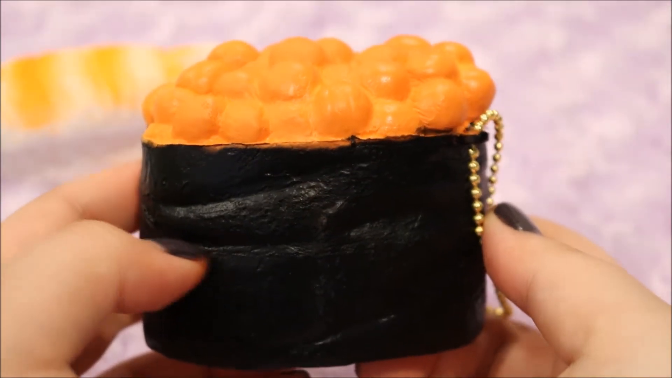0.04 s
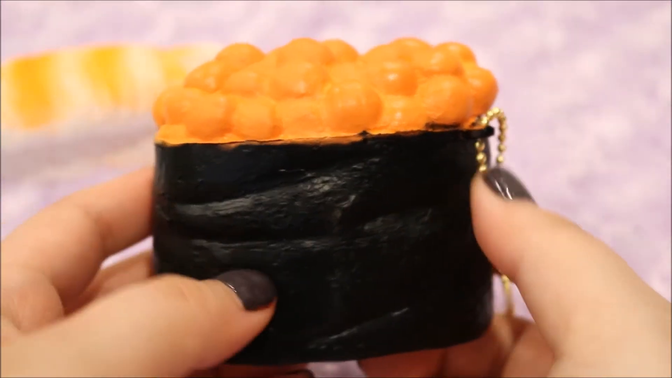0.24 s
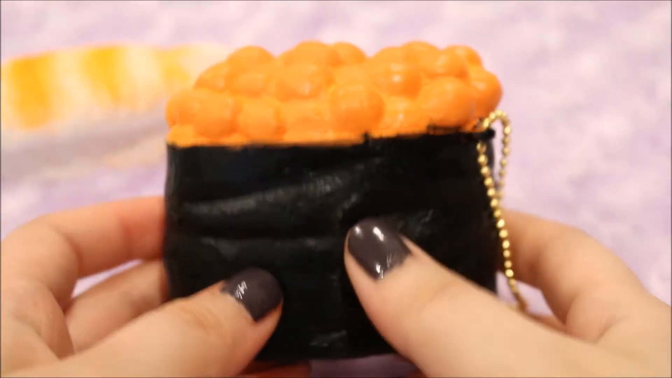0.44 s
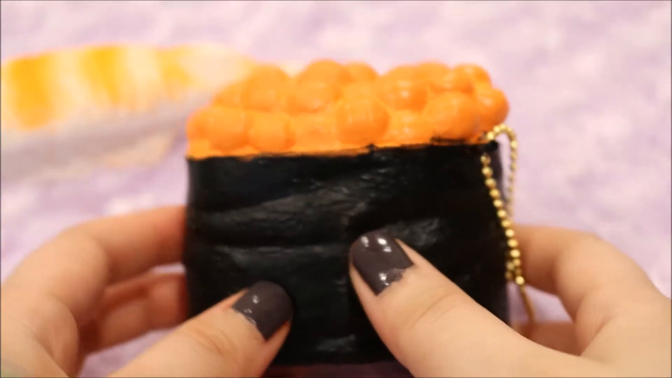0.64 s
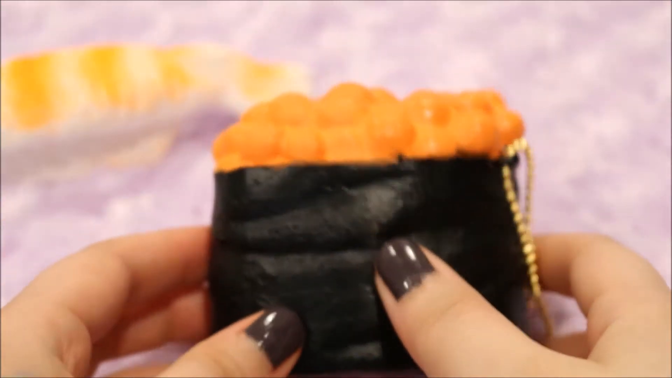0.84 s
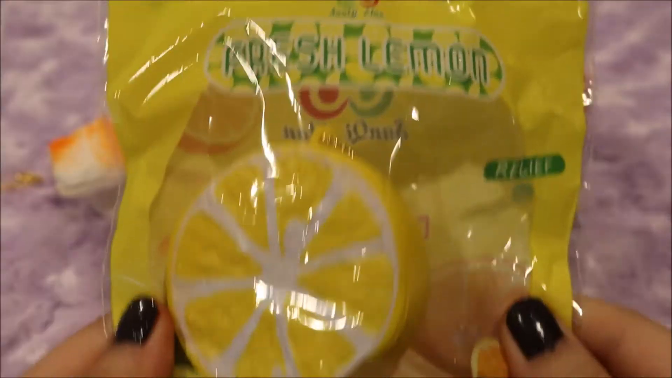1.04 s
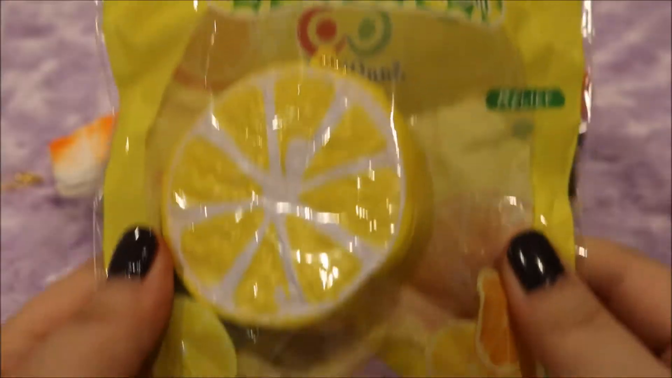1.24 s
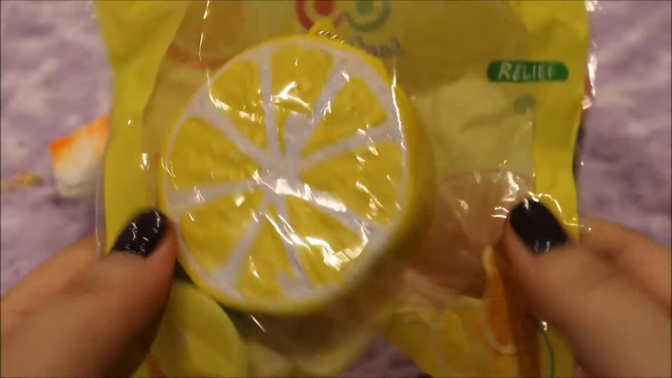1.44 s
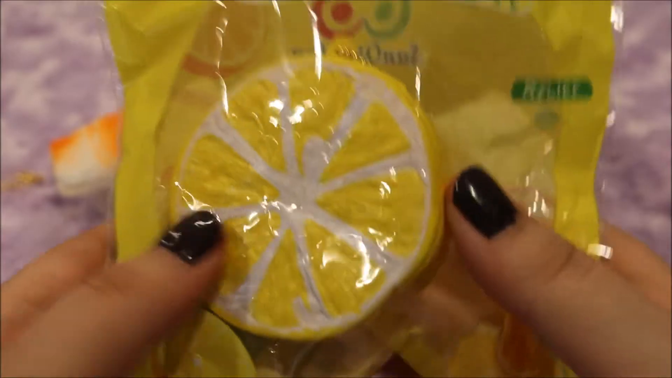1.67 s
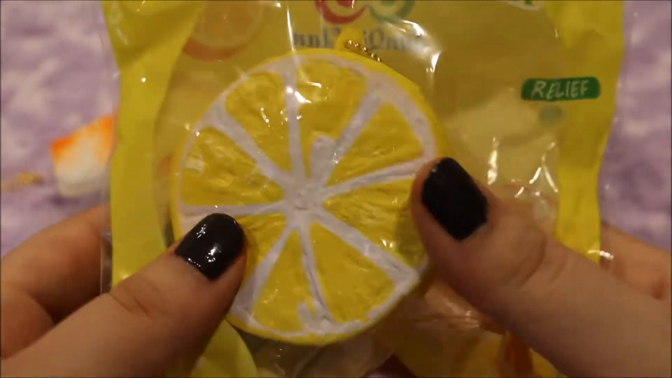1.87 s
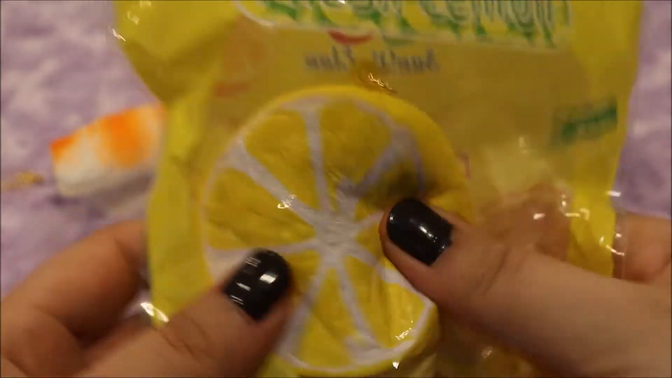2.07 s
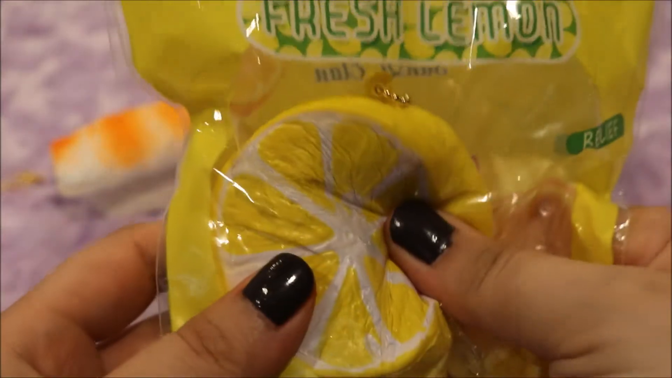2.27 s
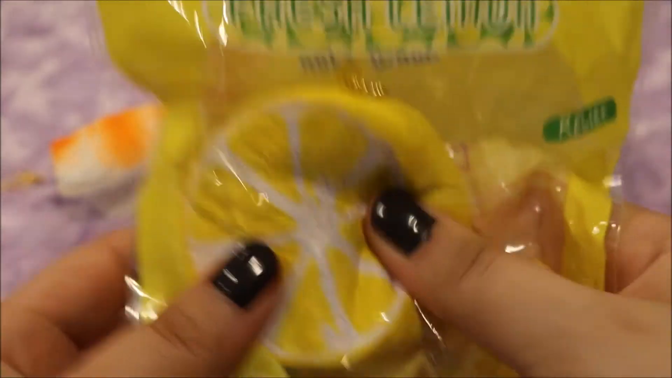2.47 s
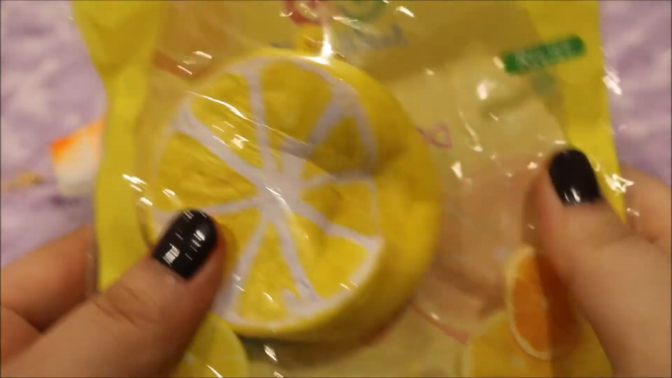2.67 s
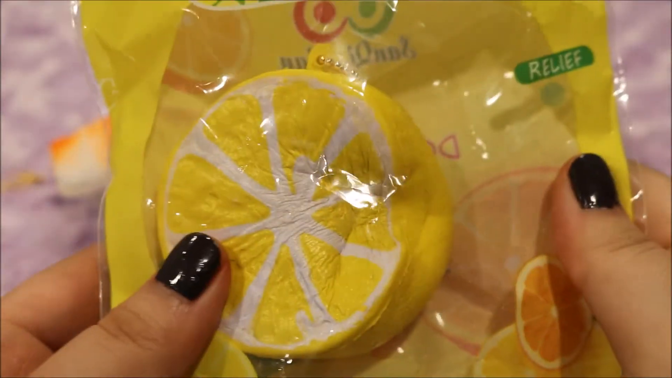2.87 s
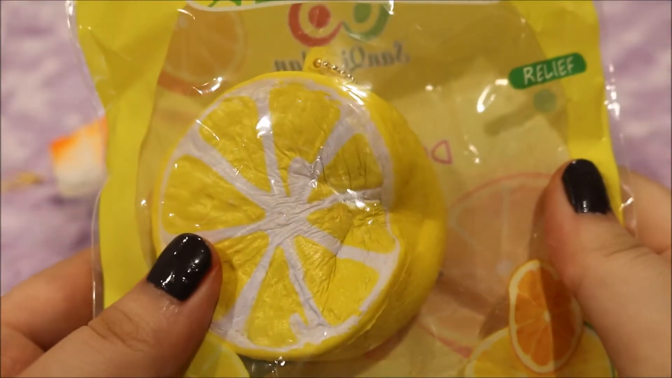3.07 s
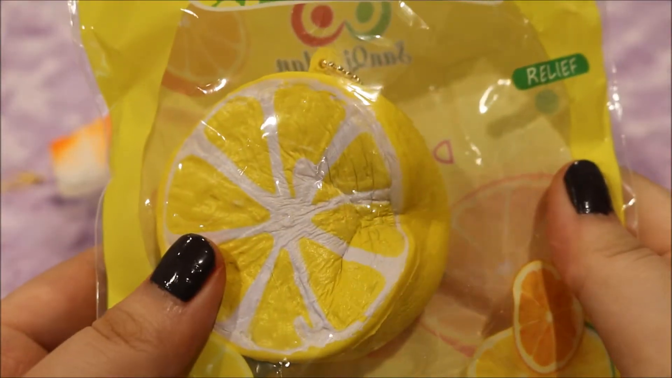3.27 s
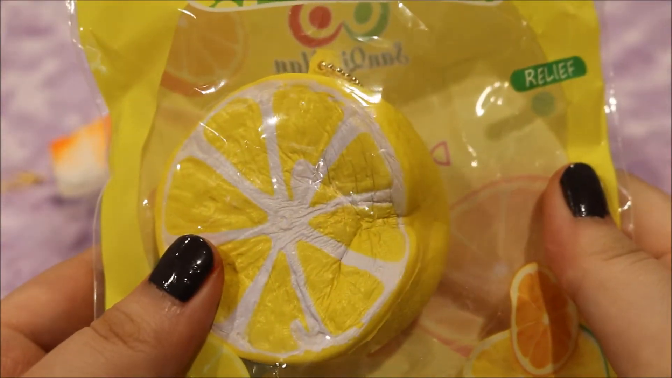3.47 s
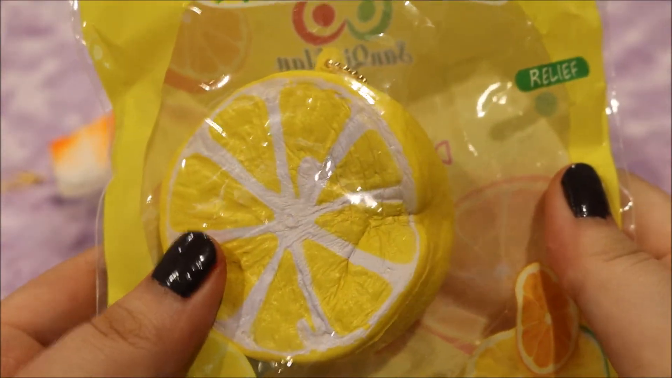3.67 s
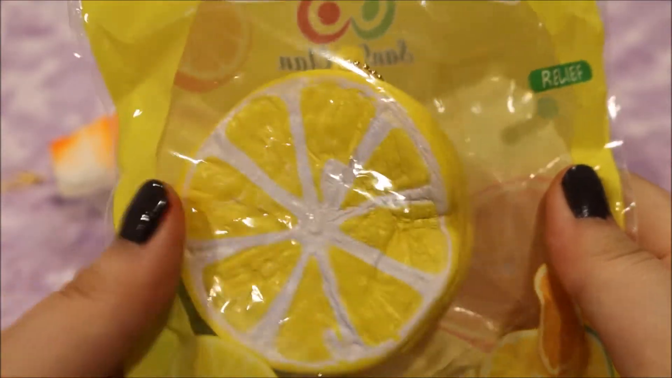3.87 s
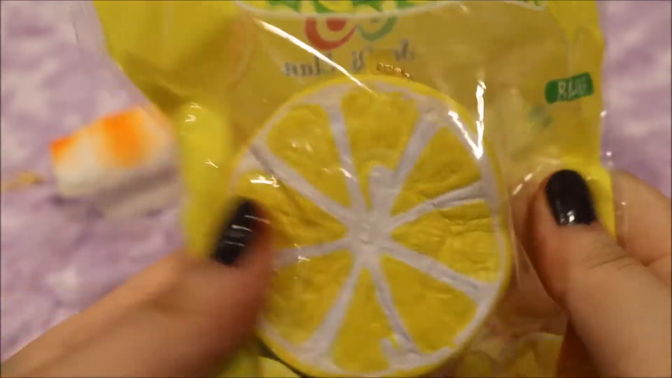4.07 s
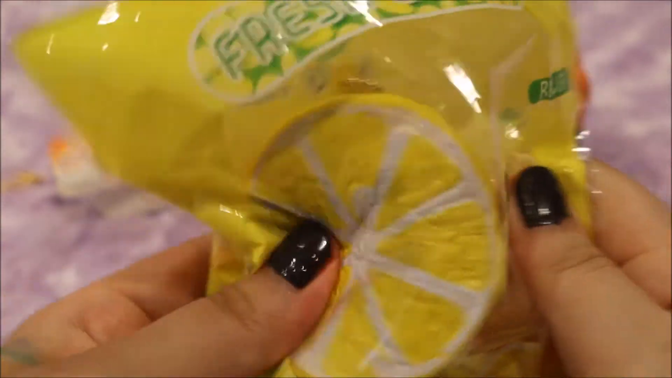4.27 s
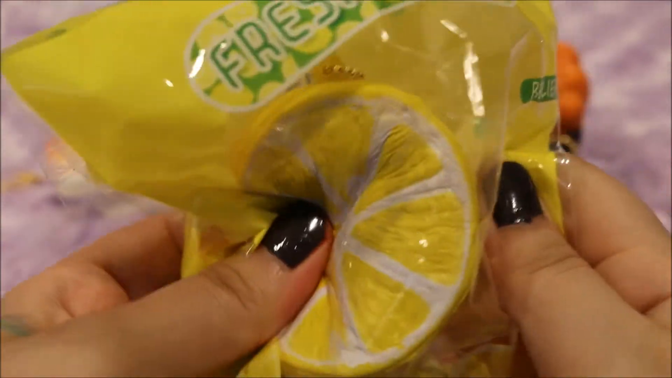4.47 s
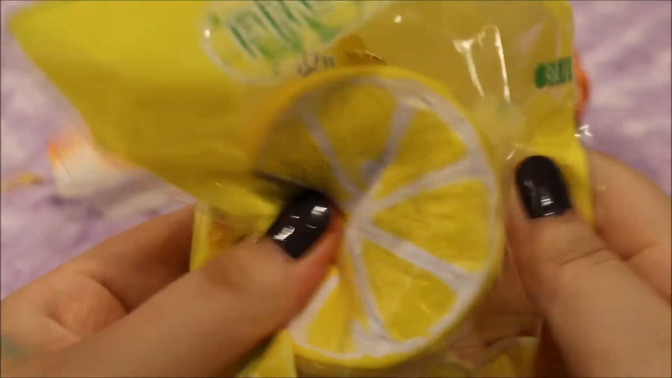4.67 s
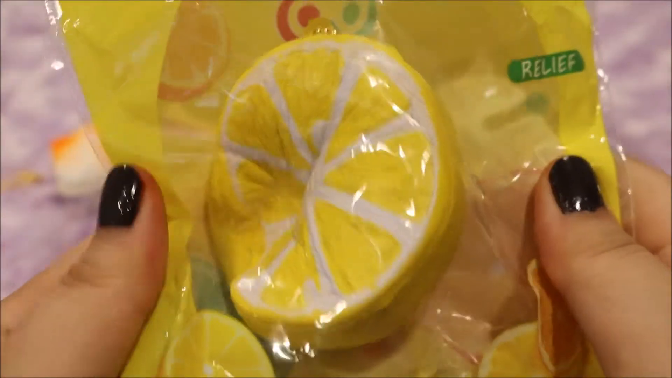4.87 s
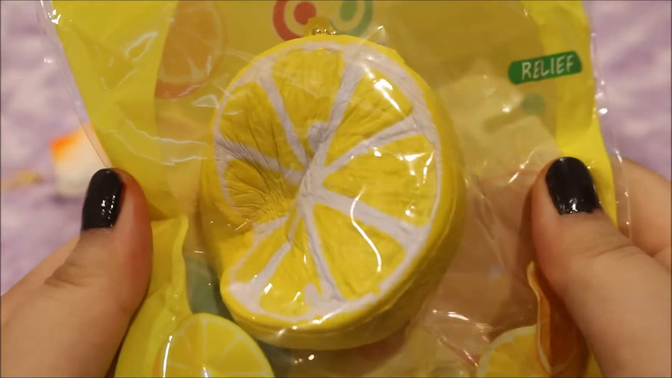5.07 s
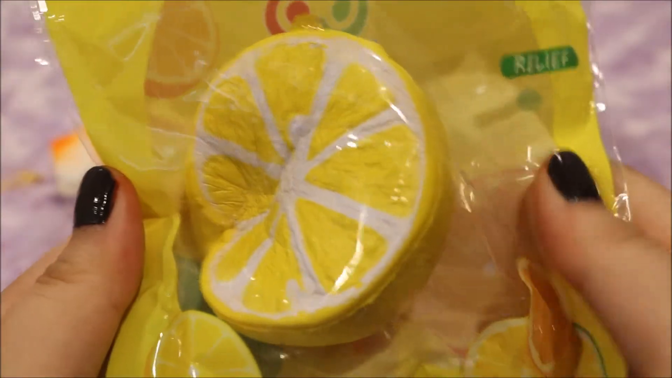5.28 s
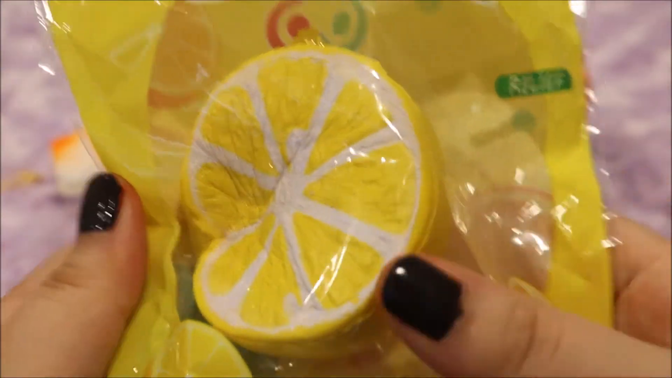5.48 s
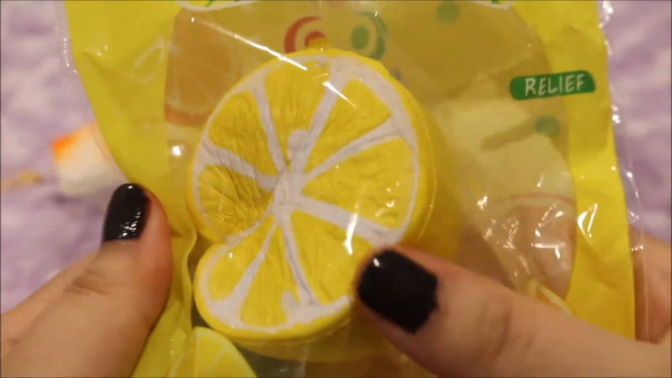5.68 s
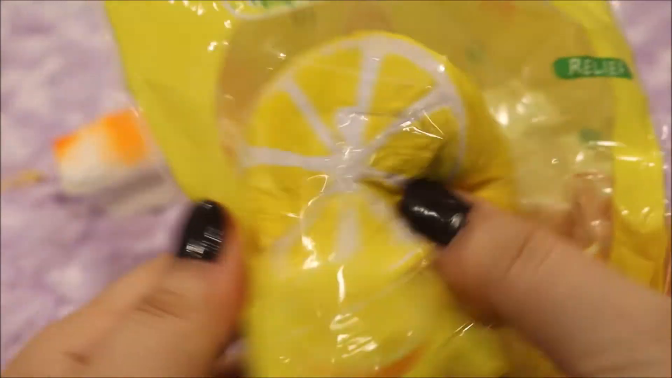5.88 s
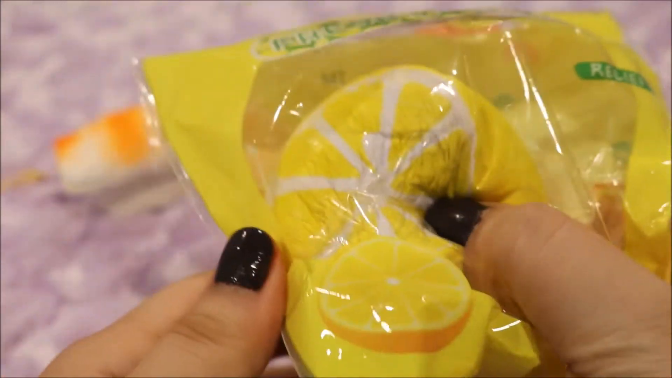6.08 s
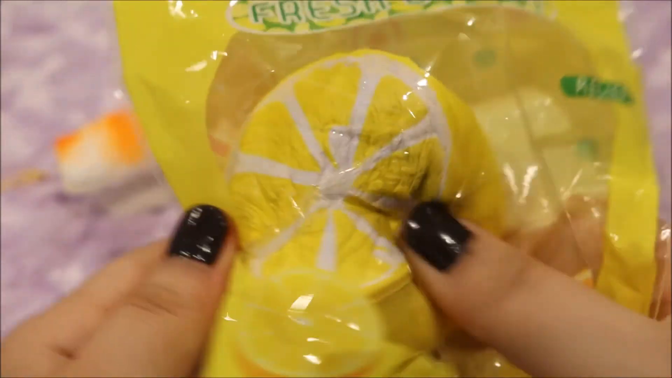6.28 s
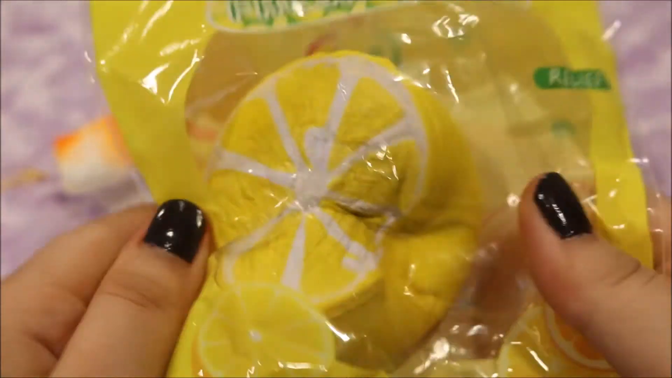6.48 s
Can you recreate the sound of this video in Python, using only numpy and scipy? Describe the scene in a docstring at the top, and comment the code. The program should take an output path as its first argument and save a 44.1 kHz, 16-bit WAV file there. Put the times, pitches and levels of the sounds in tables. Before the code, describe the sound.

For the first second there is only soft room hiss and a faint, distant motor hum, which dips for an instant. At about 1.1 seconds a stiff plastic bag begins crackling close to the microphone as hands squeeze a soft foam toy through it. Sharp, bright snaps stand out over finer crinkling, with a faint low rush of air under each squeeze. A first cluster comes around 1.5 seconds, then a denser run from 2 to 3 seconds. The bag settles to a few isolated ticks until about 3.7 seconds. The crackling then builds again and is at its loudest from 4 to 4.9 seconds. Lighter, scattered crinkles follow, before another strong burst around 5.8 seconds and more squeezes that continue to the end at about 6.5 seconds. The room is quiet, with only slight reverberation.

```python
"""A stiff plastic bag crackles as hands squeeze a soft foam toy through it, close to a two-port microphone.
Each crease that buckles radiates a crack, a few cycles of the taut film and a puff of the air inside.
Each squeeze also crowds small creases together and presses air out of the foam.
A quiet room reverberates faintly and a far motor hums; gain control lowers the level after loud snaps.
The background dips briefly just before the crackling starts."""
import sys
import numpy as np
from scipy import signal
from scipy.fft import rfft, irfft
from scipy.io import wavfile
from scipy.ndimage import uniform_filter1d

SR = 44100
rng = np.random.default_rng(int(sys.argv[2]) if len(sys.argv) > 2 else 0)


def pcm_store(signal):
    """Save signal as 16-bit PCM."""
    levels = np.round(np.clip(np.atleast_2d(signal), -1, 1) * 32767)
    wavfile.write(sys.argv[1], SR, levels.astype(np.int16).T)


N = 287532

# Loud creases. Each row: start in seconds, film level in dB, film pitch in Hz, crack in dB re the film.
LOUD_CREASES = [(1.106, -36.5, 850, -16), (1.134, -33.5, 2780, 0), (1.174, -22.5, 2500, -10),
                (1.233, -7, 3130, 1.5), (1.253, -23, 1100, -8), (1.295, -19.5, 1700, -17),
                (1.308, -21.5, 2040, -2.5), (1.366, -12.5, 2370, 8), (1.381, -16, 1000, -13),
                (1.427, -14.5, 1300, -8), (1.451, -5.5, 2270, 4.5), (1.47, -14, 1560, 9.5),
                (1.515, -7, 2780, -3), (1.522, -15.5, 336, -10), (1.598, -21, 1570, -18),
                (1.608, -13.5, 1550, 3.5), (1.716, -30.5, 980, -19), (1.767, -9.5, 2250, 0.5),
                (1.794, -32, 3000, 10), (1.836, -24, 2810, -21), (1.944, -31, 1040, -22),
                (1.956, -21.5, 2080, 5), (1.993, -8, 640, -6), (2.006, -12.5, 3160, 11),
                (2.03, -10, 1260, 6), (2.061, -3, 3540, 4), (2.073, -3.5, 3550, -7), (2.096, -7, 2770, 3),
                (2.117, -3, 2740, 2), (2.154, -7.5, 3120, 2.5), (2.193, -5, 4100, 1.5),
                (2.21, -12.5, 1830, 5), (2.238, -11, 1280, -0.5), (2.271, -8.5, 2800, 6.5),
                (2.345, -21.5, 352, -13), (2.359, -8, 3200, 1), (2.365, -21.5, 337, 3),
                (2.386, -13, 1750, 4), (2.394, -8.5, 3280, 3.5), (2.435, -15, 2840, 4.5),
                (2.465, -1.5, 3250, -2), (2.495, -22, 2690, 0), (2.516, -11.5, 1700, 6),
                (2.534, -11, 1920, -15), (2.56, -17, 2440, -20), (2.573, -18, 2550, -14),
                (2.584, -5, 1150, -11), (2.598, -7, 2270, 0), (2.639, -18.5, 392, 0), (2.665, -8, 2730, 5),
                (2.701, -18, 1010, 10), (2.739, -13.5, 2900, 13), (2.751, -12, 2300, -1),
                (2.804, -11, 2560, -5), (2.845, -20, 1000, 9), (2.86, -15.5, 1050, 9.5),
                (2.9, -13.5, 3600, -1), (2.903, -4.5, 3680, 3.5), (2.928, -19.5, 2220, 13.5),
                (2.95, -28, 594, -6), (3.175, -19, 2125, -17), (3.205, -10.5, 1600, -3.5),
                (3.308, -33.5, 1260, -17), (3.494, -32.5, 1580, -19), (3.562, -34, 2610, -21),
                (3.615, -9.5, 1740, -1), (3.769, -6.5, 2370, 3), (3.815, -23.5, 415, 5),
                (3.832, -21, 780, -20), (3.899, -12.5, 2980, 8), (3.956, -16, 1780, 5),
                (3.965, -8.5, 4740, 3.5), (3.99, -3.5, 1190, -2.5), (4.021, -4.5, 2430, 8),
                (4.091, -2, 1470, 8.5), (4.099, -3.5, 3920, 2.5), (4.172, -21, 2280, 4),
                (4.191, -6, 2330, 7), (4.211, -7, 2760, 7), (4.269, -8, 920, -19), (4.279, 2, 3100, 3.5),
                (4.317, -3, 2220, -1), (4.342, -8.5, 1200, -2), (4.352, -11, 1140, 10),
                (4.392, -13, 850, 1), (4.405, 1, 1100, -3), (4.461, -8, 1050, -0.5),
                (4.527, -13.5, 1240, -26), (4.566, -19, 4600, -2), (4.574, -19, 1540, -14),
                (4.605, -26.5, 2040, -23), (4.652, -14, 1860, -14.5), (4.676, -6, 1390, -6),
                (4.689, -21.5, 3750, 10), (4.71, -13.5, 1420, 6.5), (4.746, -8.5, 1870, -8),
                (4.784, -0.5, 1160, -0.5), (4.802, -17, 3520, 9), (4.82, -17.5, 3920, 15.5),
                (4.863, -11, 2500, 9), (4.894, 0.5, 3550, 9), (4.924, -8, 3170, 4),
                (4.999, -13.5, 1040, -1), (5.097, -22.5, 2320, -7), (5.134, -13.5, 594, -5),
                (5.185, -13.5, 850, -5.5), (5.276, -21, 810, -13.5), (5.291, -20.5, 3140, 11),
                (5.314, -27, 700, 3), (5.354, -11.5, 2030, -2), (5.366, -10, 2750, 2.5),
                (5.422, -21, 720, -30), (5.515, -30.5, 404, -17), (5.549, -27, 1170, -8),
                (5.571, -36, 600, -30), (5.617, -26, 4000, 12.5), (5.633, -13.5, 2560, 4),
                (5.638, -8, 3700, 7.5), (5.714, -3, 1580, -3), (5.762, -8, 3480, -3), (5.802, -6, 2600, 3),
                (5.814, -11, 1470, -4), (5.828, -6, 2900, 6.5), (5.876, 0, 2130, 6.5),
                (5.923, -5.5, 2630, -1.5), (5.942, 0, 3650, -3), (5.988, -8.5, 3230, 3.5),
                (6.01, -14, 2080, 5), (6.041, -10.5, 1140, -10), (6.078, -3, 980, -4),
                (6.14, -9.5, 2400, 2), (6.161, -9, 1640, -16.5), (6.185, -20.5, 1990, 15.5),
                (6.243, -11.5, 2100, -1.5), (6.269, -17.5, 2560, 1), (6.298, -12, 2820, 3.5),
                (6.352, -11.5, 1490, -15), (6.359, -11.5, 1020, 5), (6.39, -5.5, 2330, 6.5),
                (6.406, -12.5, 2420, 5), (6.422, -13, 810, 2), (6.479, -9, 3740, -2),
                (6.507, -13, 1640, -1.5)]
# Finger squeezes. Each row: peak time, rise and release in seconds, level in dB, crack in dB re the film.
SQUEEZES = [(1.469, .1, 0.12, -28.5, -2), (1.8, 0.1, 0.13, -40.5, -5.5), (2.069, 0.061, 0.11, -16.5, -1),
            (2.231, 0.055, 0.048, -23.5, -2), (2.37, 0.15, 0.084, -31.5, -2.5),
            (2.581, 0.083, .08, -17.5, 0), (2.718, 0.096, 0.084, -23, -0.5),
            (3.799, 0.045, 0.036, -34.5, -7), (4.018, 0.06, 0.3, -26.5, -11), (4.33, 0.28, .14, -18, -3.5),
            (4.78, 0.07, 0.15, -15.5, -3), (5.348, 0.06, 0.059, -28, -5), (5.68, 0.043, .05, -29, 0),
            (5.83, 0.082, 0.15, -18, -6), (6.1, 0.1, 0.023, -28.5, -4), (6.38, 0.16, 0.11, -21, -7.5)]
# Reflections from table and walls. Each row: delay in seconds, gain in dB.
EARLY_ECHOES = [(.0012, -38.5), (.0042, -20), (0.021, -36)]
# Reverberation times. Each row: frequency in Hz, seconds to decay by 60 dB.
REVERB_TIMES = [(300, 0.38), (1000, 0.42), (3000, 0.28), (8000, 0.37), (15000, 0.14)]
# Likeness of the room's sound at the two ports. Each row: frequency in Hz, coherence from 0 to 1.
COHERENCE = [(60, 0.34), (240, 0.79), (950, 0.14), (3770, 0.02), (15000, 0.02)]
# Room and preamplifier noise. Each row: frequency in Hz, relative spectral density in dB.
NOISE_SPECTRUM = [(13, -11), (22, -14), (85, -16), (118, -6.5), (143, -23.5), (205, -8.5), (366, -9),
                  (469, -18), (524, -14), (653, -20), (885, -21.5), (1170, -23), (4760, -33.5), (9480, -30),
                  (16000, -40.5)]
# Wavering hum of a far motor. Each row: centre in Hz, bandwidth in Hz, level in dB.
MOTOR_BANDS = [(57, 31, -57.5), (114.9, 0.97, -59)]
# Microphone response. Each row: frequency in Hz, gain in dB.
MIC_RESPONSE = [(100, -2.5), (400, -6.5), (3200, 3), (4900, 1), (7000, 5), (10500, 1), (13000, -6),
                (16000, -9.5)]

SNAP_SAMPLES, LEAD_SAMPLES = 768, 128  # whole snap, part before its onset
TIME = np.arange(N) / SR


def snap(noise, hz, crack_db):
    """Buckling releases stored strain as a ring, a crack and a puff; slack, low film moves more air."""
    common, *apart, air = noise
    apart = np.array(apart)
    pan_db = (-2.6 + 2.8 * air[0]) * np.array([[.5], [-.5]])  # most creases lie to the right
    shade = min(hz / 2500, 1)  # the housing shades only short waves
    ring = burst(common + .3 * shade * apart, hz / 1.25, hz * 1.25, decay_s=1.6 / hz)
    skirt = burst(air + 0.39 * apart, hz / 3, 4040, decay_s=0.0028)
    film = unit_peak(ring + gain_of(-5) * skirt) * gain_of(shade * pan_db)
    crack = burst(common + 0.68 * apart, 4240, 15360, decay_s=0.0013) * gain_of(pan_db)
    puff = gain_of(-5.5 - 3.77 * np.log2(hz / 1000)) * burst(air, 334, 1155, decay_s=0.0045)
    bright = film + gain_of(crack_db) * crack
    bright[0] = np.roll(bright[0], round(1.4 - 1.3 * air[0]))  # the nearer port hears it first
    return bright + puff


def burst(noise, lo_hz, hi_hz, decay_s):
    """A band-limited transient of unit peak: it jumps, holds while the crease runs and stops short."""
    t = (np.arange(SNAP_SAMPLES) - LEAD_SAMPLES) / SR
    envelope = np.where(t < 0, .1 * np.exp(t / .0004), np.exp(-(t / decay_s) ** 2))
    return unit_peak(bandpass(noise * envelope, lo_hz, hi_hz))


def loud_creases():
    """Superposition: the large creases buckle one by one and their pressures add."""
    out = np.zeros((2, N + SNAP_SAMPLES))
    for start_s, db, hz, crack_db in LOUD_CREASES:
        noise = rng.standard_normal((4, SNAP_SAMPLES))
        first = round(start_s * SR) - LEAD_SAMPLES
        out[:, first:first + SNAP_SAMPLES] += gain_of(db) * snap(noise, hz, crack_db)
    return out[:, :N]


def small_creases(pitches=40, film_hz=(720, 3850), base_per_s=330, spread_db=4.5):
    """A Poisson process: small creases buckle at random, more often under a harder squeeze."""
    level_db, crack_db = squeeze_levels()
    crowding = gain_of(0.49 * (level_db + 29.5))
    strength = gain_of(spread_db * np.minimum(rng.exponential(1, N), 3))
    strength *= rng.random(N) < base_per_s * crowding / SR
    strength *= gain_of(level_db) / np.sqrt(crowding)  # power follows the squeeze at any rate
    pitch_index = rng.integers(0, pitches, N)
    film, crack = np.zeros((2, 2, N))
    for k, hz in enumerate(np.geomspace(*film_hz, pitches)):
        noise = rng.standard_normal((4, SNAP_SAMPLES))
        impulses = (strength * (pitch_index == k))[None]
        dull = snap(noise, hz, crack_db=-np.inf)
        tilt = gain_of(1.55 * np.log2(hz / 2000))  # short creases favour high pitches
        film += signal.oaconvolve(impulses, tilt * dull, axes=1)[:, :N]
        crack += signal.oaconvolve(impulses, snap(noise, hz, 0) - dull, axes=1)[:, :N]
    return film + crack * gain_of(crack_db)


def squeeze_levels(ease_db=-13, held_db=-69.5, held_from_s=0.9):
    """Incoherent powers add: the squeezes' total level and mean crack share, in dB at each sample."""
    t = TIME[::64]
    peak_s, rise, release, db, crack_db = np.transpose(SQUEEZES)[:, :, None]
    from_peak = np.where(t < peak_s, (peak_s - t) / rise, (t - peak_s) / release)
    power = gain_of(2 * (db + ease_db * from_peak ** 1.06))
    total = power.sum(0) + gain_of(2 * held_db) * (t > held_from_s) + 1e-12
    mean_crack_db = (power * crack_db).sum(0) / total
    return np.interp(TIME, t, 10 * np.log10(total)), np.interp(TIME, t, mean_crack_db)


def foam_air(band_hz=(135.6, 420)):
    """Flow noise: air pressed out of the foam and bag makes a low, lumpy rush with each squeeze."""
    noise, lumps = rng.standard_normal((2, 2, N))
    rush = unit_rms(bandpass(noise[0] + 0.56 * noise, *band_hz))
    lumps_db = 4 * unit_rms(uniform_filter1d(uniform_filter1d(lumps[0], 600), 600))
    squeeze_db, _ = squeeze_levels()
    return rush * gain_of(-21 + lumps_db + .8 * squeeze_db)


def room_reflections(x, tail_db=-13.5, softness=0.16):
    """Reverberation: early echoes, then scattered reflections that decay exponentially in each band."""
    taps = np.zeros((2, SR // 2))
    slots = np.arange(260, SR // 2 - 20, 20)
    arrivals = slots + rng.integers(0, 20, (2, len(slots)))
    np.put_along_axis(taps, arrivals, rng.choice([-1., 1.], arrivals.shape), 1)
    hz, t, bands = signal.stft(taps, SR, nperseg=256)
    bands[1] = correlated(*bands, curve_at(COHERENCE, hz / 2)[:, None])
    decay = gain_of(-60 * t / curve_at(REVERB_TIMES, hz)[:, None])
    tail = signal.istft(bands * decay, SR, nperseg=256)[1]
    tail *= gain_of(tail_db) / np.linalg.norm(tail[0])
    response = signal.lfilter([1 - softness, softness], 1, tail)  # cloth and walls absorb treble
    for delay_s, db in EARLY_ECHOES:
        response[:, round(delay_s * SR)] += gain_of(db)
    return signal.fftconvolve(x, response, axes=1)[:, :N]


def noise_and_hum(noise_db=-48.5):
    """Stationary noise, more coherent between the ports for long waves, with a motor's narrow bands."""
    hz = np.fft.rfftfreq(N, 1 / SR)
    left, independent = rfft(rng.standard_normal((2, N)))
    spectra = np.array([left, correlated(left, independent, curve_at(COHERENCE, hz))])
    colour = gain_of(curve_at(NOISE_SPECTRUM, hz) - curve_at(MIC_RESPONSE, hz))
    hum = sum(gain_of(db) * unit_rms(irfft(left / (1 + (2 * (hz - centre) / width) ** 2), N))
              for centre, width, db in MOTOR_BANDS)
    return gain_of(noise_db) * unit_rms(irfft(spectra * colour, N)) + hum


def correlated(left, independent, coherence):
    """Partial coherence: a right channel that shares part of the left at constant power."""
    return coherence * left + np.sqrt(1 - coherence ** 2) * independent


def bandpass(x, lo_hz, hi_hz):
    """Filtering passes the band between two edges."""
    return signal.lfilter(*signal.butter(2, [lo_hz, hi_hz], "band", fs=SR), x)


def curve_at(points, hz):
    """Interpolation along a logarithmic frequency axis."""
    knots_hz, values = np.transpose(points)
    return np.interp(np.log(hz + 1), np.log(knots_hz + 1), values)


def gain_of(db):
    """Decibels as an amplitude ratio."""
    return 10 ** (np.asarray(db) / 20)


def unit_rms(x):
    """Normalisation to unit mean power."""
    return x / np.sqrt(np.mean(x ** 2) + 1e-20)


def unit_peak(x):
    """Normalisation so that the mean of the channels peaks at 1."""
    return x / abs(np.atleast_2d(x).mean(0)).max()


def scene():
    """Direct sound, reflections and background add linearly."""
    bag = loud_creases() + small_creases() + foam_air()
    return bag + room_reflections(bag) + noise_and_hum()


def record(dry, threshold_db=-31, recovery_db_per_s=19.8, dip_s=(0.934, .965), cutoff_hz=16000):
    """Microphone colour and gain compression, then clipping, a brief dip in level and a band limit."""
    hz = np.fft.rfftfreq(512, 1 / SR)
    colour = signal.firwin2(255, hz, gain_of(curve_at(MIC_RESPONSE, hz)), fs=SR)
    x = signal.oaconvolve(dry, colour[None], "same")
    power = uniform_filter1d((x ** 2).mean(0), size=880, origin=439)  # over the last 20 ms
    power_db = 10 * np.log10(abs(power) + 1e-12)
    fall_db = TIME * recovery_db_per_s
    peak_db = np.maximum.accumulate(power_db + fall_db) - fall_db  # jumps up, sinks slowly
    excess_db = np.maximum(peak_db - threshold_db, 0)
    x /= gain_of(0.27 * uniform_filter1d(excess_db, size=220, origin=109))
    dip = np.where((TIME > dip_s[0]) & (TIME < dip_s[1]), gain_of(-27), 1)
    lowpass = signal.firwin(511, cutoff_hz, window=("kaiser", 9), fs=SR)
    return signal.oaconvolve(np.clip(x, -1, 1) * dip, lowpass[None], "same")


dry = scene()
out = record(dry)
pcm_store(out)
```